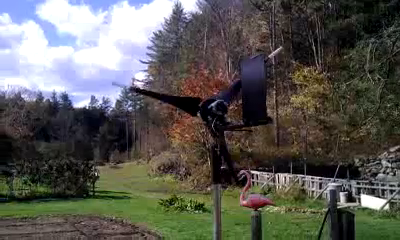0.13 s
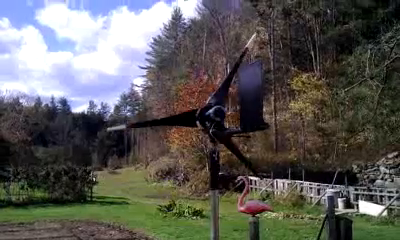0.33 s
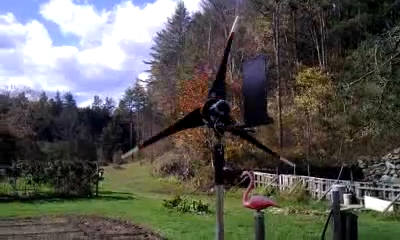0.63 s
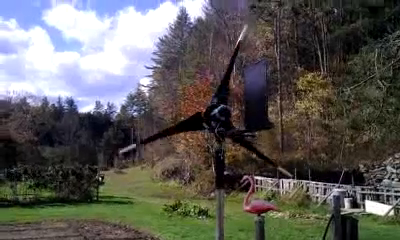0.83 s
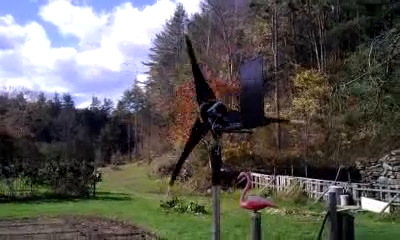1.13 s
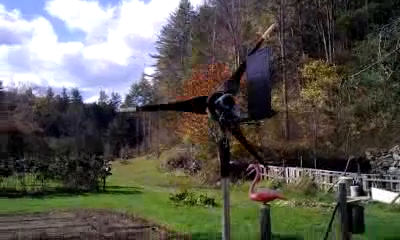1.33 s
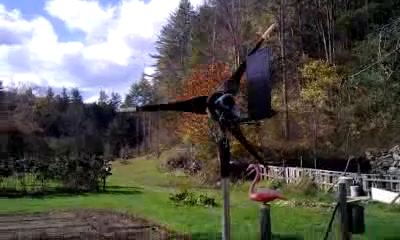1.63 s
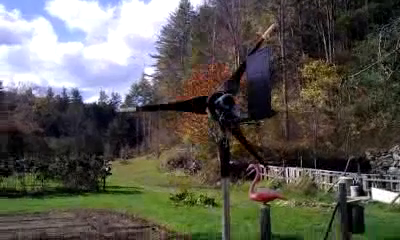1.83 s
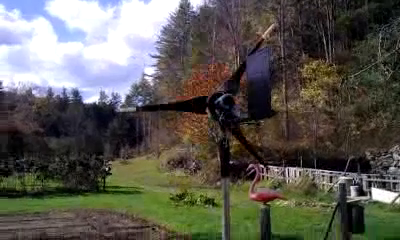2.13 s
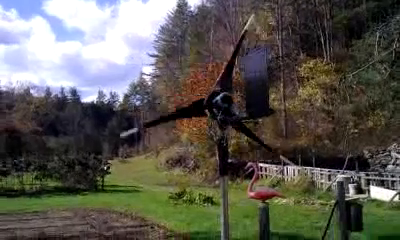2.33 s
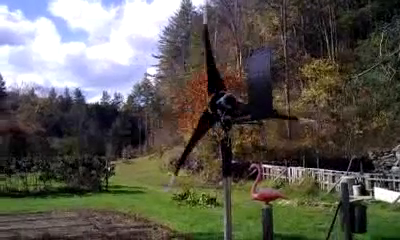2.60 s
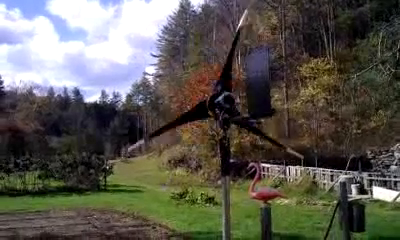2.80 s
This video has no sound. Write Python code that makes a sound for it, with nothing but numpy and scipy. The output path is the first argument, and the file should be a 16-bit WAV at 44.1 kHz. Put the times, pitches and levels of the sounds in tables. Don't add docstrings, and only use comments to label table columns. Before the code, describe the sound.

Gusty wind buffets a small microphone outdoors, rumbling and thumping in distorted bursts over faint hiss.

```python
import sys
import numpy as np
from scipy import signal
from scipy.fft import rfft, irfft, next_fast_len
from scipy.io import wavfile
from scipy.ndimage import uniform_filter1d, map_coordinates

SR = 44100
rng = np.random.default_rng(int(sys.argv[2]) if len(sys.argv) > 2 else 0)


def volts_from_db(level):
    exponent = np.asarray(level, float) / 20
    return 10 ** exponent


def master(y):
    cut = np.clip(np.atleast_2d(y).T, -1, 1)
    pcm = np.round(cut * 32767)
    wavfile.write(sys.argv[1], SR, pcm.astype(np.int16))


N = 130536

# t/s, level/dB
HISS_LEVEL = [(0.08, -53.5), (0.38, -67), (0.44, -61.5), (0.5, -64), (0.54, -61), (0.56, -67), (0.6, -59.5),
              (0.93, -66.5), (1.63, -64.5), (2.16, -67.5), (2.64, -67), (2.77, -62), (2.84, -65.5),
              (2.96, -65)]
# f/Hz, level per Hz/dB
HISS_COLOR = [(300, -38.5), (900, 12), (2000, 8), (3200, 2), (5000, 2.5), (6300, 4.5), (7500, 8.5),
              (8800, 0.5), (10200, -8)]
# t/s, depth on the hiss/dB, recovery/s, depth on the wind/dB
GAIN_DUCKS = [(0.206, 8, 0.086, 0.5), (.34, 6, .07, 1), (0.483, 10, 0.053, 3), (.505, -2, 0.021, 25.5),
              (0.557, 15, 0.046, 0.5), (0.569, -5.5, 0.043, 13), (0.877, 9.5, 0.029, 5.5),
              (0.944, 4, 0.081, 3.5), (1.05, -1.5, .06, 1), (1.164, 1.5, 0.022, 12.5),
              (1.221, 2, 0.021, 8.5), (1.27, -7, 0.034, 11.5), (1.317, 13, 0.017, 9.5), (1.44, -5, .04, 6),
              (1.591, -0.5, 0.049, 8), (1.751, 5.5, 0.098, 1.5), (2.013, -1.5, .03, 5.5),
              (2.102, 6, 0.023, 27.5), (2.177, 6.5, 0.12, 1.5), (2.28, -7, 0.02, 13),
              (2.352, 5.5, 0.013, 14), (2.562, 6, 0.025, 0.5), (2.716, 12, 0.023, 2), (2.82, 5, 0.027, 2.5),
              (2.844, 21, 0.014, 12.5)]
# t/s, strength/dB, small eddies over large ones/dB
WIND = [(0.08, -35.5, -8.5), (0.12, -38, -12.5), (0.5, -36.5, -8), (0.7, -37.5, -18.5), (0.84, -36, -6),
        (1.41, -33, -7.5), (1.46, -35.5, -7), (1.71, -31.5, -4.5), (1.76, -37.5, -3.5), (1.84, -31.5, -4.5),
        (2.14, -38, -8), (2.27, -31, -4.5), (2.37, -40, -6), (2.51, -29, -4), (2.59, -36, -11.5),
        (2.75, -29, -5), (2.86, -37, -10), (2.96, -32.5, -2.5)]
# f/Hz, level per Hz/dB
LARGE_EDDIES = [(20, -4.5), (50, -4), (110, 1), (200, 1), (300, -10), (600, -49.5)]
# f/Hz, level per Hz/dB
SMALL_EDDIES = [(120, -26), (250, -2), (400, -2.5), (520, -7), (750, -20.5), (1200, -33), (4000, -52.5)]
# t/s, jolt level/dB, overdrive/dB, length/s
BURSTS = [(0.358, -53, 8, 0.042), (0.484, -34.5, 4, 0.017), (0.533, -49, 5, 0.033), (0.811, -56, 4, 0.01),
          (0.965, -53, 6.5, 0.053), (1.019, -28.5, 10, 0.034), (1.113, -36, 5, 0.034),
          (1.158, -23.5, 2.5, 0.09), (1.238, -22.5, 15, 0.03), (1.342, -21, 4.5, 0.037),
          (1.392, -25.5, 2, 0.015), (1.548, -80, -3, 0.013), (1.605, -25, 9, 0.01), (1.659, -46, 12, 0.01),
          (1.687, -24, 13, 0.03), (1.776, -29, 0, 0.03), (1.85, -47, 1.5, 0.031), (1.913, -30.5, 2, 0.049),
          (1.983, -26, -5, 0.03), (2.077, -32, 9, 0.011), (2.194, -41, 6.5, 0.043),
          (2.272, -34, 2.5, 0.014), (2.312, -18, 5, 0.041), (2.519, -42, 5, 0.046), (2.595, -22, 12, 0.042),
          (2.707, -44, 8, 0.03), (2.732, -19.5, 3, 0.04), (2.797, -26, 4.5, 0.09), (2.883, -50, 6, 0.036),
          (2.941, -42, 1.5, 0.03)]
# t/s, level/dB
LONE_JOLTS = [(0.212, -41), (0.236, -36), (0.268, -56), (0.369, -37), (0.386, -35), (0.473, -27),
              (0.935, -38), (1.182, -32), (1.25, -59.5), (1.557, -28), (1.634, -33), (1.67, -28),
              (1.708, -55.5), (1.716, -56), (1.746, -48), (2.089, -16), (2.171, -27.5), (2.241, -21),
              (2.276, -38), (2.337, -31.5), (2.393, -34), (2.407, -21), (2.468, -59.5), (2.546, -41),
              (2.602, -29.5), (2.683, -42), (2.745, -33), (2.776, -39), (2.838, -24), (2.869, -41)]
# f/Hz, threshold per bin/dB
WEAK_BANDS = [(2000, -102), (3000, -98), (5500, -97), (7000, -94), (8500, -94), (9300, -93), (10200, -93)]

TOP_HZ = 10150


def unit(x):
    return x / np.sqrt(np.mean(x ** 2) + 1e-20)


def along(points, hz):
    f, v = np.transpose(points)
    return np.interp(np.log(hz + 1), np.log(f + 1), v)


def curve(rows, col=1):
    table = np.transpose(rows)
    return np.interp(np.arange(N) / SR, table[0], table[col])


def wobble(rate):
    return map_coordinates(rng.standard_normal(N // 100), [np.arange(N) * rate / SR])


def filtered(x, response):
    m = next_fast_len(N + SR // 2)
    hz = np.fft.rfftfreq(m, 1 / SR)
    return irfft(rfft(x, m) * response(hz), m)[..., :N]


def rush(spectrum, patchy_db):
    z = signal.stft(rng.standard_normal(N), nperseg=512)[2]
    patches = uniform_filter1d(rng.standard_normal(z.shape), size=6, axis=0)
    patches = unit(uniform_filter1d(patches, size=6, axis=1))
    x = signal.istft(z * volts_from_db(patchy_db * patches), nperseg=512)[1][:N]
    return unit(filtered(x, lambda hz: volts_from_db(along(spectrum, hz))))


def ducking_db(col):
    t = np.arange(N) / SR
    snap_s = 0.004
    total = 0
    for row in GAIN_DUCKS:
        since = t - row[0]
        dip = np.clip(np.minimum(since / snap_s, 1 - since / row[2]), 0, 1)
        total = total - row[col] * dip
    return total


def blades_and_leaves():
    level_db = curve(HISS_LEVEL) + 5.0 + 0.86 * wobble(22) + 0.42 * wobble(50)
    return volts_from_db(level_db) * rush(HISS_COLOR, patchy_db=2.2)


def burst_drive_db():
    t = np.arange(N) / SR
    calm_db, most_db, flutter_db, rise_s = -0.5, 8, 1.5, 0.003
    start, _, over_db, length = np.transpose(BURSTS)[:, :, None]
    shape = np.clip(np.minimum((t - start) / rise_s + 1, (start + length - t) / rise_s + 1), 0, 1)
    push_db = (np.minimum(over_db, most_db) * shape).max(axis=0)
    return calm_db + push_db + flutter_db * (wobble(30.014) + wobble(70))


def pressure_jolts(when, size_db, wave, top):
    decay_s, edge_hz, boost_db = 0.0015, 1500, 7
    kicks = np.zeros(N)
    at = np.round(when * SR).astype(int)
    kicks[at] = -np.sign(wave[at]) * volts_from_db(size_db + boost_db) / top[at]
    return filtered(kicks, lambda hz: SR / (1 / decay_s + 2j * np.pi * hz) / (1 + 1j * hz / edge_hz) ** 3)


def wind_buffeting():
    t = np.arange(N) / SR
    headroom_db = 5
    knee, ceiling = 3.22, 1.05
    puff_db, puff_s = 4.5, 0.009
    low_cut_hz, wind_start_s = 28, 0.078

    when, size_db = np.transpose([row[:2] for row in BURSTS] + LONE_JOLTS)
    nearness = 1 - np.abs(t - when[:, None] - puff_s / 2) / puff_s
    puffs_db = puff_db * np.clip(nearness, 0, 1).max(axis=0)
    drive_db = burst_drive_db() + puffs_db / 2

    small_db = puffs_db + curve(WIND, col=-1) + 3 + 1.37 * wobble(40)
    small = volts_from_db(small_db) * rush(SMALL_EDDIES, patchy_db=2.0)
    large = rush(LARGE_EDDIES, patchy_db=0.5)
    wave = volts_from_db(drive_db - headroom_db) * (large + small)

    top = volts_from_db(curve(WIND) + headroom_db)
    flat = wave / (1 + np.abs(wave) ** knee) ** (1 / knee)
    flat = flat + pressure_jolts(when, size_db, wave, top)
    flat = flat / (1 + np.abs(flat / ceiling) ** 8) ** (1 / 8)
    onset = np.clip((t - wind_start_s) / 0.003, 0.15, 1)
    return onset * top * filtered(flat, lambda hz: 1j * hz / (low_cut_hz + 1j * hz))


def scene():
    hiss = volts_from_db(ducking_db(col=1)) * blades_and_leaves()
    wind = volts_from_db(ducking_db(col=3)) * wind_buffeting()
    return (wind + hiss)[None]


def drop_weak_bands(x):
    band_scatter_db, frame_scatter_db, bin_under_db = 5, 6, -9
    hz, _, z = signal.stft(x, SR, nperseg=512, noverlap=256, window="cosine")
    band = np.arange(len(hz)) // 8
    power = np.abs(z) ** 2
    level = np.add.reduceat(power, np.arange(0, len(hz), 8), axis=1)[:, band] / 8
    frames = z.shape[-1]
    by_band = band_scatter_db * rng.standard_normal((band[-1] + 1, frames))[band]
    by_frame = frame_scatter_db * rng.standard_normal(frames) * hz[:, None] / TOP_HZ
    floor = volts_from_db(along(WEAK_BANDS, hz)[:, None] + by_band + by_frame) ** 2
    floor = floor * (hz[:, None] > 2000)
    kept = (level > floor) & (power > floor * volts_from_db(2 * bin_under_db))
    return signal.istft(z * kept, SR, nperseg=512, noverlap=256, window="cosine")[1][:, :N]


def low_pass(x):
    return signal.sosfilt(signal.butter(12, 10990, fs=SR, output="sos"), x)


def record(dry):
    start_s, fade_s = 0.056, 0.0088
    fade_in = np.clip((np.arange(N) / SR - start_s) / fade_s, 0, 1)
    mix = filtered(drop_weak_bands(dry) * fade_in, lambda hz: hz < TOP_HZ)
    return low_pass(mix)


dry = scene()
out = record(dry)
master(out)
```